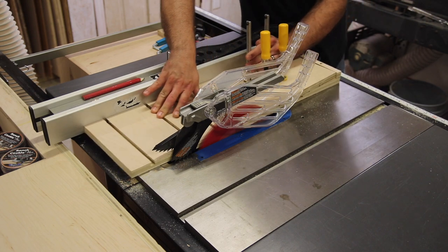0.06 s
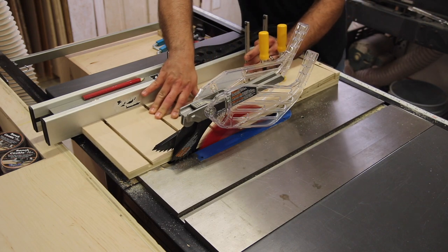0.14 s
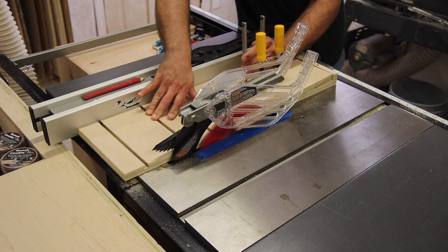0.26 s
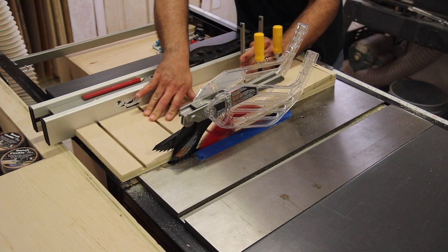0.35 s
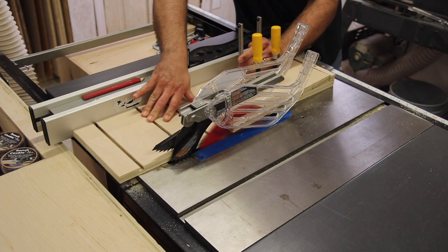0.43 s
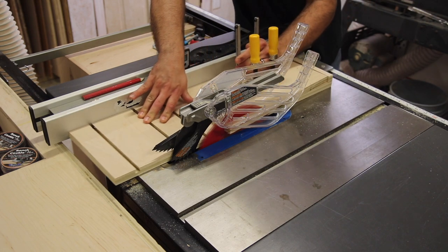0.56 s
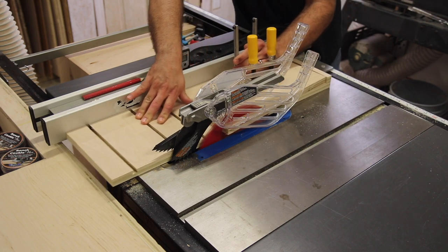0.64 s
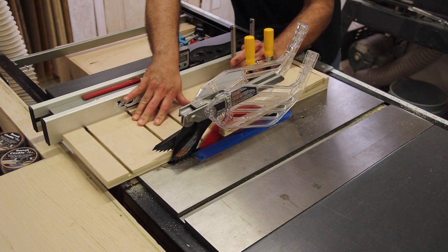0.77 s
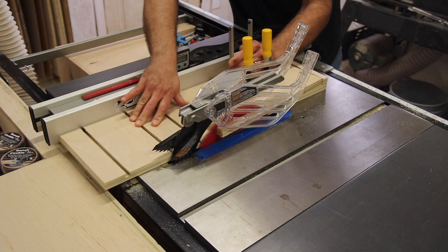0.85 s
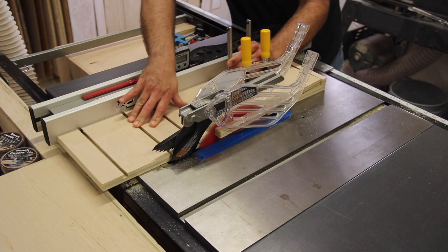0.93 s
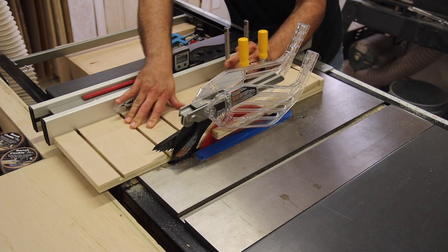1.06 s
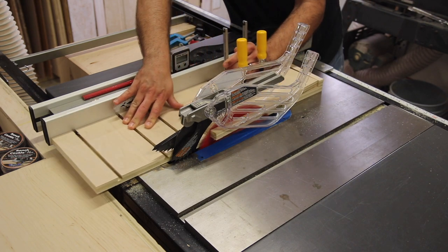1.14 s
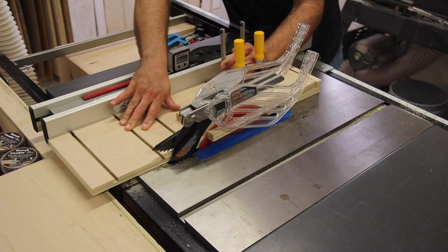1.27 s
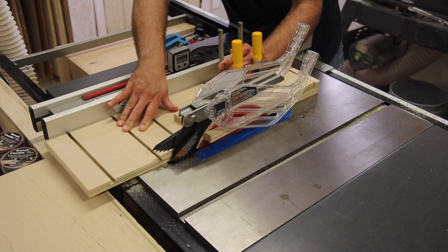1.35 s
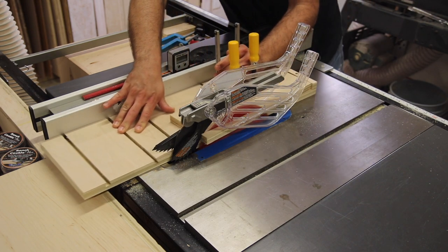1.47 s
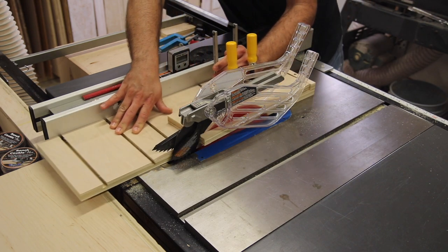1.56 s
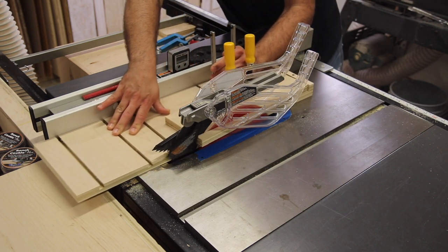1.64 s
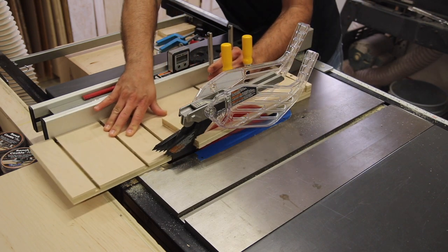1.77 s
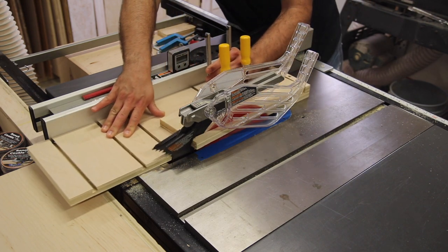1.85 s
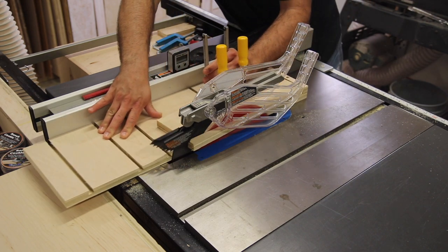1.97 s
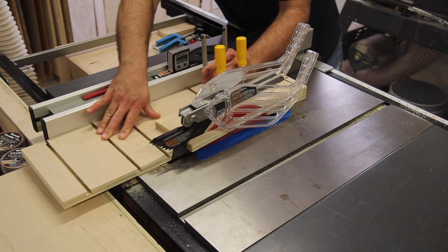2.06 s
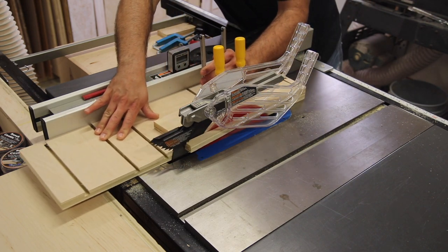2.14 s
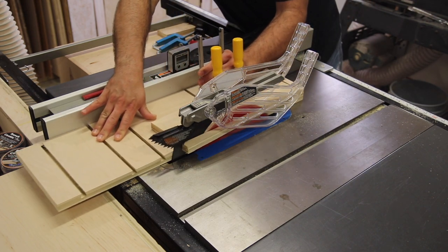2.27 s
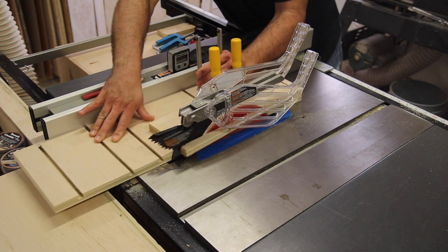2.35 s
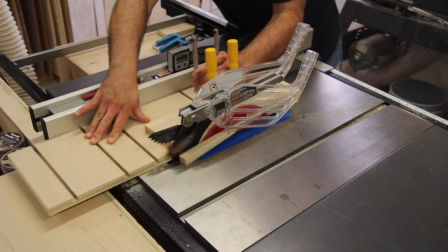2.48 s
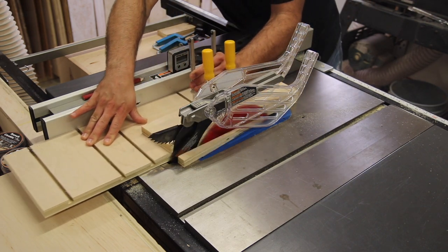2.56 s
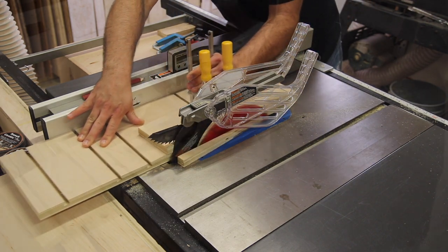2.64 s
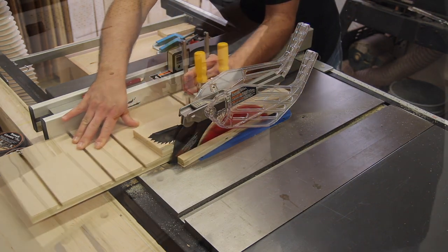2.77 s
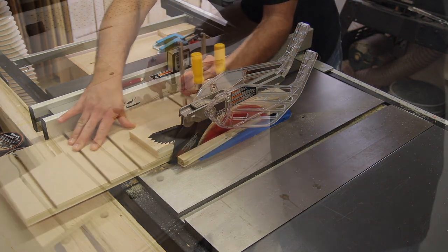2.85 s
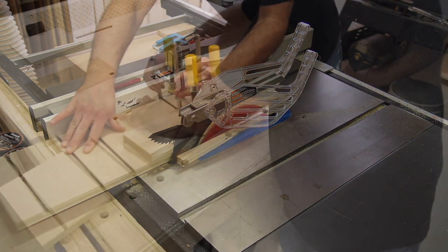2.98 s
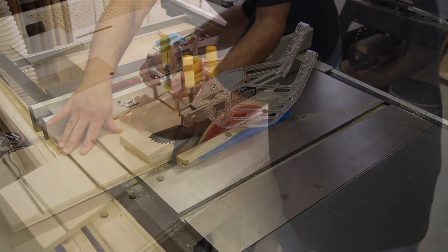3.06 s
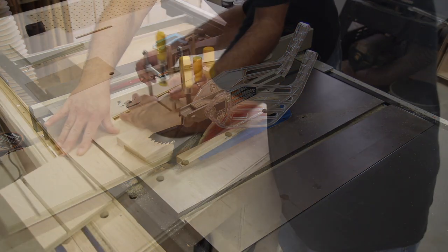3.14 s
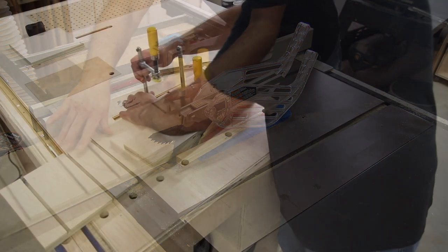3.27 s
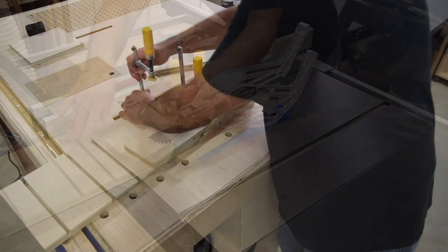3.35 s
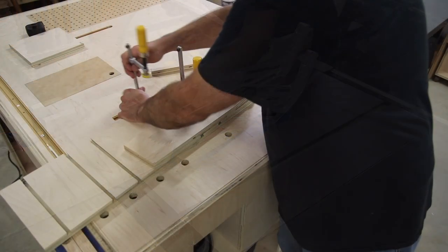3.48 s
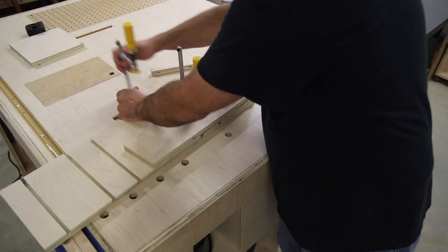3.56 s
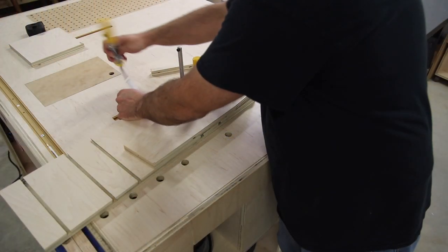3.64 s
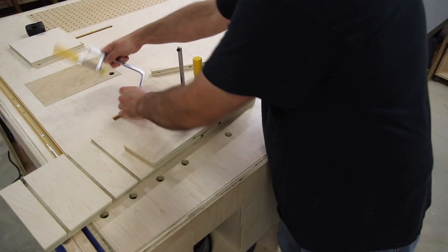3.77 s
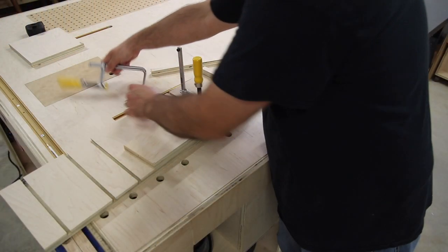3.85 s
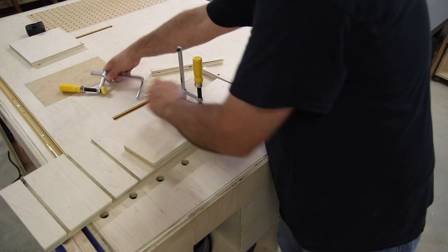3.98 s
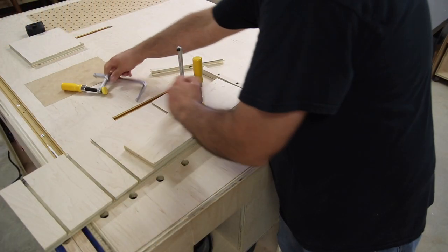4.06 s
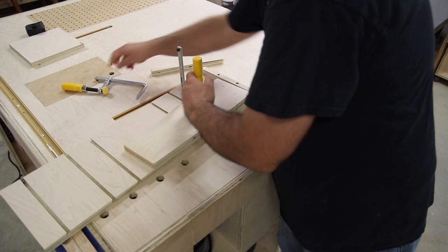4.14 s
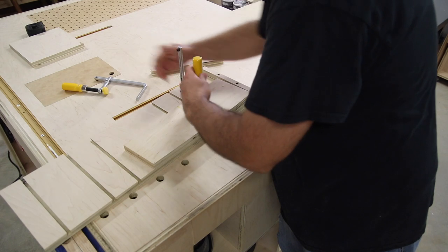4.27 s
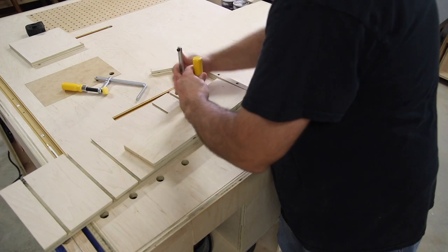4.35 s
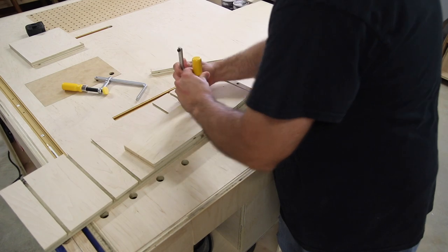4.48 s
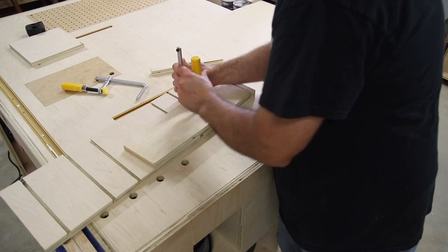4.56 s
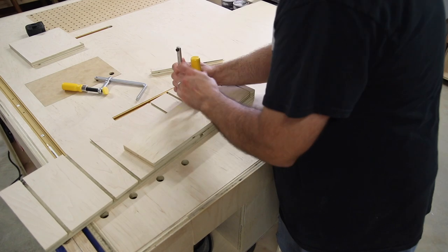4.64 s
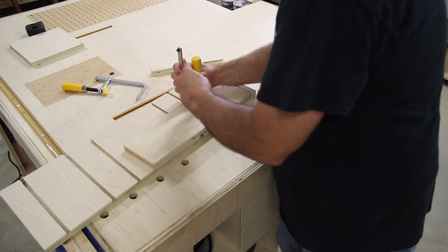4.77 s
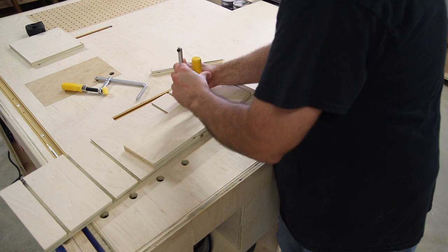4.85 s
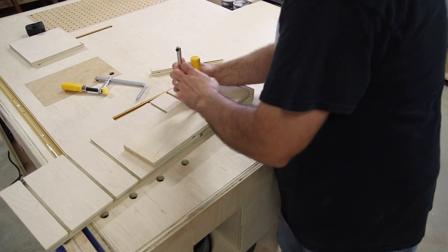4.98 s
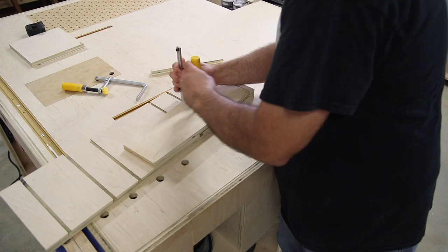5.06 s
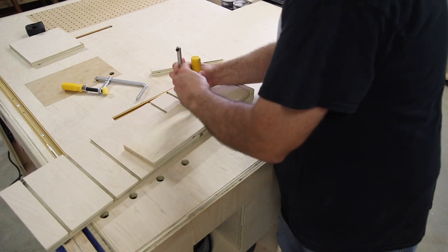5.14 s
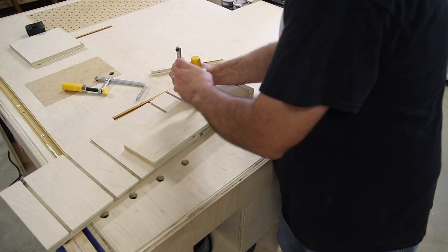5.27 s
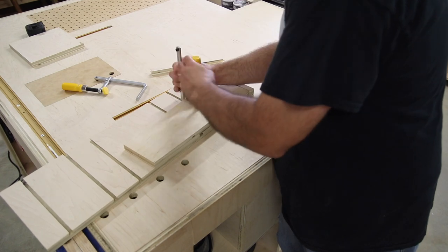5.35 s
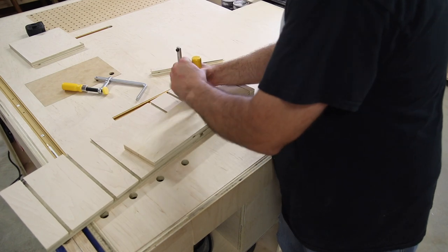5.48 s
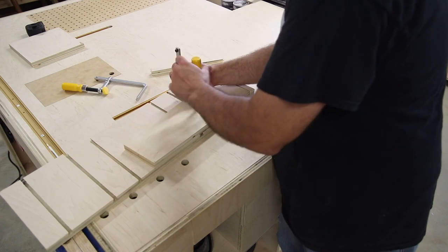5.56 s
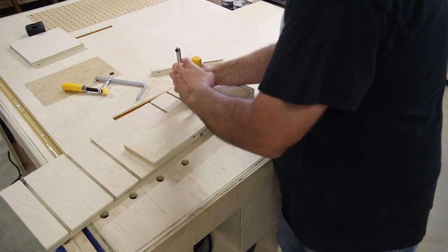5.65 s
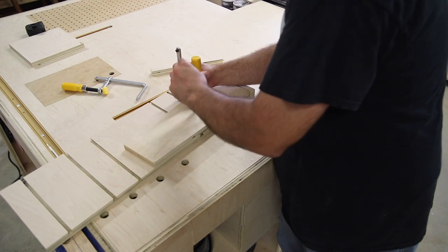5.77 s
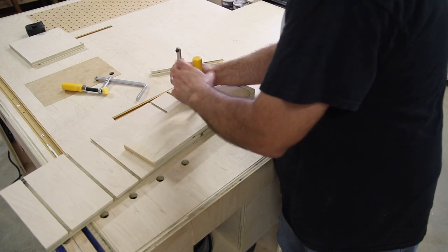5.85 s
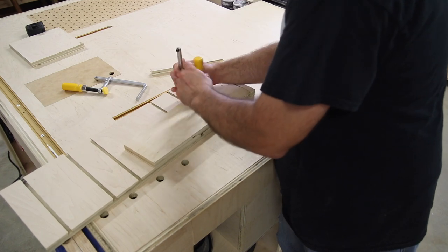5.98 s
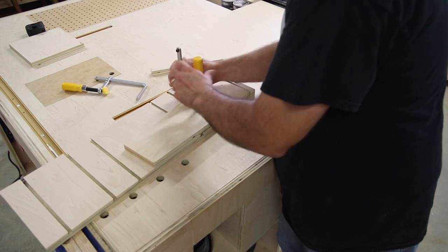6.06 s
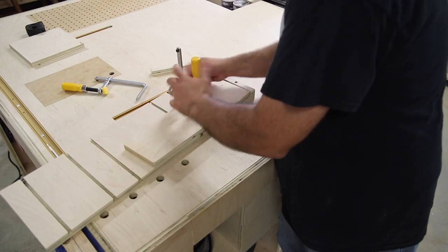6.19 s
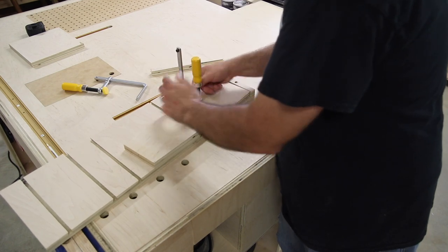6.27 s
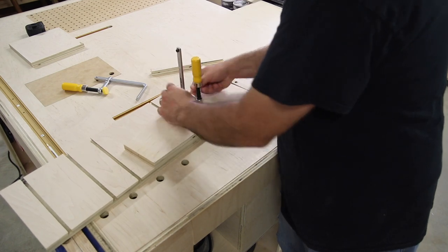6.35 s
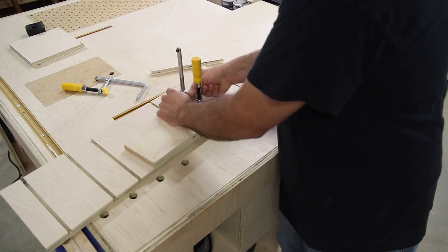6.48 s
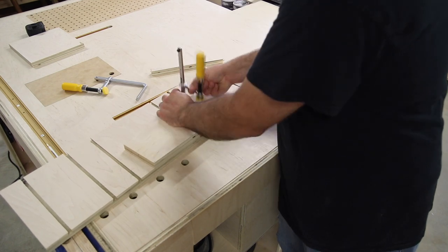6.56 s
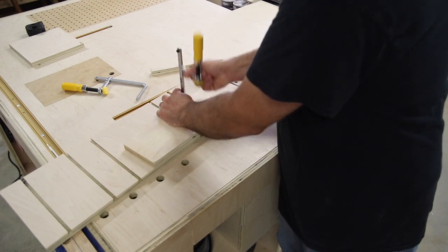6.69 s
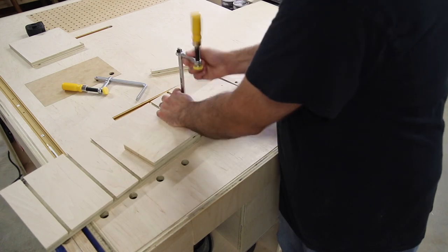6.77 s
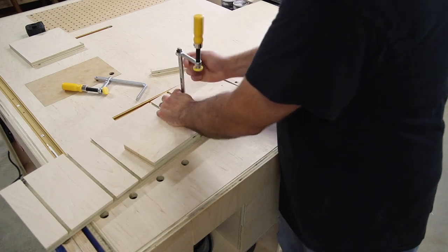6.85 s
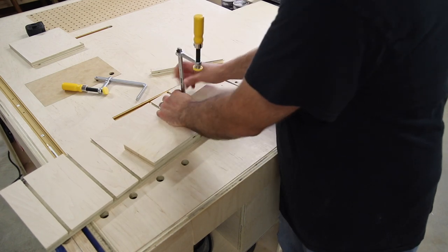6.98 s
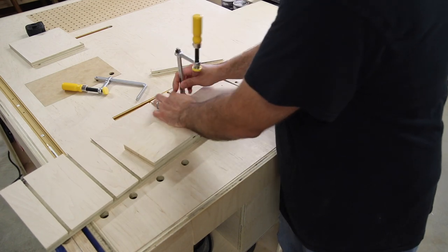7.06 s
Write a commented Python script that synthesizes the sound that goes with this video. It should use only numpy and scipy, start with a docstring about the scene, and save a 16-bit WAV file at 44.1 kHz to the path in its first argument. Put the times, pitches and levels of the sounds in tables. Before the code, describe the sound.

Close in a small workshop, a spinning saw blade sings and squeals through wood over motor hum and cabinet rumble. After a brief crack the cutting tone drops away and the rush fades. Bench handling takes over against faint hum and hiss: solid wooden blows, a bright ringing metal landing, a near-quiet pause with tiny ticks, light knocks, short clamp rubs and one hard final click.

```python
"""A table saw rips a board: its teeth whine at multiples of the shaft speed over the noisy rush of the
blade. The offcut chatters and breaks free with a crack, then the saw fades away.
At a wooden bench, decaying noise and ringing tones make knocks on a jig, heavy blows, and a steel clamp
laid down ringing; shaped noise makes another clamp slide along its groove.
A small workshop answers with dying noise, over a faint mains hum and hiss."""
import sys
import numpy as np
from scipy import signal
from scipy.fft import rfft, irfft, next_fast_len
from scipy.io import wavfile

SR = 44100
rng = np.random.default_rng(int(sys.argv[2]) if len(sys.argv) > 2 else 0)


def dump(signal):
    """Clip the signal to [-1, 1] and save it as 16-bit WAV at the path in sys.argv[1]."""
    limited = np.clip(np.atleast_2d(signal).T, -1, 1)
    pcm = np.round(limited * 32767).astype(np.int16)
    wavfile.write(sys.argv[1], SR, pcm)


N = 313979
T = np.arange(N) / SR  # the time of every sample, in seconds


def amp(db):
    """Turn decibels into a gain."""
    return 10 ** (np.asarray(db) / 20)


def unit(x):
    """Scale x to an average strength (rms) of 1."""
    return x / np.sqrt(np.mean(x ** 2) + 1e-20)


def sine(hz):
    """A steady pure tone of rms 1."""
    return np.sqrt(2) * np.sin(2 * np.pi * hz * T)


def along(points, hz):
    """Read a curve of (frequency, value) points, joined by straight lines on a log axis."""
    f, v = np.transpose(points)
    return np.interp(np.log(hz + 1), np.log(f + 1), v)


def ramp(start, end):
    """0 before start, 1 after end, a straight line between."""
    return np.clip((T - start) / (end - start), 0, 1)


def since(s):
    """Seconds since s, zero before it."""
    return np.maximum(T - s, 0)


def stroke(s, length, rise_db_per_s, fall_db_per_s):
    """A gain that rises to 1 at s, holds for the length and falls away."""
    before = np.maximum(s - T, 0)
    return amp(-rise_db_per_s * before - fall_db_per_s * since(s + length))


def wobble(rate):
    """A randomly wandering curve that takes a new direction rate times a second."""
    knots = rng.standard_normal(int(N * rate / SR) + 2)
    return np.interp(T * rate, np.arange(len(knots)), knots)


def filtered(x, response):
    """Multiply each frequency in x by a response."""
    m = next_fast_len(len(x) + 4096)
    spectrum = rfft(x, m) * response(np.fft.rfftfreq(m, 1 / SR))
    return irfft(spectrum, m)[:len(x)]


def coloured(x, spectrum):
    """Shape x with a table of frequencies and levels, then scale it to rms 1."""
    return unit(filtered(x, lambda hz: amp(along(spectrum, hz))))


def noise(spectrum, size=N):
    """Coloured noise of rms 1."""
    return coloured(rng.standard_normal(size), spectrum)


def resonant(x, centre_hz, q):
    """Pass x through one resonance, narrower for a higher q, then scale it to rms 1."""
    return unit(filtered(x, lambda hz: 1 / (1 + 1j * q * (hz / centre_hz - centre_hz / (hz + 1)))))


def ring(modes, t, spread_db):
    """Sum of dying tones, each at a new random strength for every blow."""
    total = 0
    for hz, db, t60 in modes:
        level_db = db + spread_db * rng.standard_normal() - 60 * t / t60
        total = total + amp(level_db) * np.sin(2 * np.pi * (hz * t + rng.random()))
    return total


def add(track, s, sound):
    """Mix a sound into the track at s seconds."""
    part = track[round(s * SR):][:len(sound)]
    part += sound[:len(part)]


# how long the workshop rings: (frequency [Hz], time to fall by 60 dB [s])
ROOM = [(150, 0.56), (500, 0.37), (1500, 0.37), (4000, 0.35), (8000, 0.3), (15000, 0.26)]


def dying(size):
    """Noise in which each frequency dies at the workshop's own speed, after a soft start."""
    hz, t, z = signal.stft(rng.standard_normal(size), SR, nperseg=256)
    decay = amp(-60 * t / along(ROOM, hz)[:, None])
    tail = signal.istft(z * decay, SR, nperseg=256)[1][:size]
    return tail * (1 - np.exp(-np.arange(size) / SR / 0.005))


def in_room(x, wet_db):
    """x plus the workshop's answer, made by smearing x with dying noise."""
    tail = dying(SR // 2)
    answer = signal.fftconvolve(x, tail / np.linalg.norm(tail))[:len(x)]
    return x + amp(wet_db) * answer


# the mains hum, before the background gain: (frequency [Hz], level [dB])
MAINS = [(57.5, -78.5), (118, -75.5)]
# colour of the background hiss: (frequency [Hz], relative level [dB])
FLOOR = [(25, -31), (55, -7), (85, -17.5), (200, -12), (400, -12.5), (900, -26.5), (4000, -33),
         (15500, -38)]
# gain of hum and hiss together: (time [s], level [dB])
BACKGROUND_LEVEL = [(2.4, 7.5), (3.1, 19.5), (3.68, 18), (3.9, 1)]


def workshop():
    """Noise for hiss and slowly wavering tones for mains hum, strongest while the saw dies away."""
    hum = sum(amp(db + wobble(2.7)) * sine(hz) for hz, db in MAINS)
    hiss = amp(-75.5) * noise(FLOOR)
    times, levels_db = np.transpose(BACKGROUND_LEVEL)
    return amp(np.interp(T, times, levels_db)) * (hum + hiss)


# colour of the scraping: (frequency [Hz], relative level [dB])
SCRAPE = [(90, -28.5), (240, 0.5), (420, 1), (600, -9), (850, -21), (1200, -9.5), (1620, -10), (2400, -12),
          (3200, -11), (4200, -16), (6000, -28), (10500, -32.5), (15500, -59)]
# rubs: the clamp's foot in its groove, and at 5.2 s a hand on the screw handle: # (start [s], length [s], level
# [dB], resonance [Hz])
RUBS = [(3.573, 0.046, -50, 1186), (5.208, .09, -80, 3400), (5.767, 0.055, -70, 3330),
        (6.6, .09, -40, 1620), (6.7, .075, -42, 3120), (6.779, .05, -42, 1620)]
# how fast each rub grips and lets go
RUB_RISE_DB_PER_S, RUB_FALL_DB_PER_S = 3500, 1204
RUB_RING_DB, RUB_RING_Q = -7, 7  # the resonance against the scrape


def slide():
    """The clamp's foot scrapes in a dense run of tiny slips; the resonance shifts along the groove."""
    slips_per_s = 110 * amp(4 * wobble(70))
    since_slip = np.cumsum(slips_per_s) / SR % 1  # goes from 0 to 1 between slips
    friction = amp(-11 * since_slip + 2.5 * wobble(400)) * rng.standard_normal(N)
    rub = coloured(friction, SCRAPE)
    strokes = np.zeros(N)
    for s, length, db, hz in RUBS:
        grip = amp(db) * stroke(s, length, RUB_RISE_DB_PER_S, RUB_FALL_DB_PER_S)
        strokes += grip * (rub + amp(RUB_RING_DB) * resonant(friction, hz, RUB_RING_Q))
    return in_room(strokes, wet_db=-6.5)


# ringing tones of the steel bar: (frequency [Hz], relative level [dB], time to fall by 60 dB [s])
STEEL = [(6470, -18, 0.33), (7390, -11.5, 0.39), (9150, -13, .3), (9330, -3.5, 0.24), (12240, 4, 0.16),
         (14020, -20.5, 0.33), (14550, -7.5, 0.25), (15560, -10.5, 0.12)]
# broad resonances of the clamp's loose jaw: (frequency [Hz], relative level [dB])
JAW = [(1970, -25), (4050, -34.5)]
# steel meets the bench: (time [s], level [dB])
CLINKS = [(4.1618, -26), (4.176, -36.5), (4.2012, -42.5), (4.25, -50.5)]
# bright chink of each contact: pitch, relative level, time to fall by 60 dB
CHINK_HZ, CHINK_DB, CHINK_T60_S = 12580, 3.5, .015


def clamp_bar():
    """The steel bar lands, bounces with bright chinks and rings unsteadily; its loose jaw rattles."""
    track, t = np.zeros(N), np.arange(SR * 3 // 4) / SR
    for s, db in CLINKS:
        chink_noise = resonant(rng.standard_normal(len(t)), CHINK_HZ, q=10)
        chink = amp(CHINK_DB - 60 * t / CHINK_T60_S) * chink_noise
        jaw = sum(amp(level) * resonant(dying(len(t)), hz, q=5) for hz, level in JAW)
        add(track, s, amp(db) * (ring(STEEL, t, spread_db=1.5) + chink + jaw))
    unsteady = amp(3.5 * wobble(200) - 2)
    return in_room(track * unsteady, wet_db=-8)


# colours of a wooden clack and of a sharp tick: (frequency [Hz], relative level [dB])
CLACK = [(40, -44), (200, -2), (750, -8), (1100, -2.5), (1700, -4.5), (3500, -3), (5000, -12.5),
         (8000, -28), (16000, -44)]
TICK = [(2500, -17.5), (5500, 3.5), (10000, -2), (16000, -10.5)]
# colour of a heavy blow's tail: (frequency [Hz], relative level [dB])
BODY = [(50, -48.5), (140, -12), (250, -5.5), (480, 1.5), (720, 1.5), (1000, -7.5), (1900, -7),
        (2800, -11.5), (4200, -10.5), (5500, -17.5), (16000, -35)]
# ringing tones of the bench top: (frequency [Hz], relative level [dB], time to fall by 60 dB [s])
BENCH = [(264, -14, .38), (445, 2.5, 0.33), (742, -2, 0.24), (1360, -11, .11)]
# heavy blows on the bench: (time [s], level [dB], ring of the bench top against the blow [dB])
BLOWS = [(3.94, -26, -13), (3.944, -14.5, -15), (3.948, -22, -16), (4.1524, -28.5, -24.5),
         (4.1605, -16.5, -20.5)]


def blows():
    """A heavy blow cracks, rings the bench top and fills the bench's frame and the room with a tail."""
    track, t = np.zeros(N), np.arange(SR * 3 // 4) / SR
    for s, db, ring_db in BLOWS:
        contact_noise = noise(CLACK, size=len(t)) + amp(-10) * noise(TICK, size=len(t))
        contact = amp(-60 * t / .022) * contact_noise
        body = amp(-27.5) * coloured(dying(len(t)), BODY)
        top = amp(ring_db) * ring(BENCH, t, spread_db=3.5) * (1 - np.exp(-t / 0.0046))
        soft_start = 1 - np.exp(-t / 0.00079)
        add(track, s, amp(db) * (contact + body + top) * soft_start)
    return track


# ringing tones of the wooden jig, varied a little at each knock:
# (frequency [Hz], relative level [dB], time to fall by 60 dB [s])
JIG = [(488, -6, .12), (1090, -5, 0.087), (1620, -1.5, 0.049), (3400, -2.5, .045)]
# knocks on jig and bench; a hard contact ticks more and thuds less:
# (time [s], level [dB], hardness [dB], thud pitch [Hz])
KNOCKS = [(3.076, -31, -6.5, 273), (3.1, -29, -5, 255), (3.349, -47, -12, 260), (3.363, -36.5, 6.5, 400),
          (3.373, -31.5, 2.5, 300), (3.71, -48, 1, 410), (3.773, -54, 6.5, 395), (4.45, -66, -12.5, 335),
          (4.934, -61, 12, 401), (4.947, -51.5, 3.5, 348), (5.528, -59, -2, 398), (5.575, -59, 5, 494),
          (5.802, -43.5, -1.5, 402), (5.85, -40, 3.5, 406), (5.893, -43, -1.5, 285),
          (6.003, -46.5, -5.5, 299), (6.073, -44.5, -9, 266), (6.132, -36, 1, 308), (6.205, -54, -3, 354),
          (6.325, -60.5, 7.5, 396), (6.518, -65.5, -10.5, 399), (6.596, -32, 8.5, 344),
          (6.611, -33.5, 4.5, 386), (6.662, -33, 8, 350), (6.833, -24, 14, 390), (6.838, -32.5, -4.5, 413)]
TICK_DB = -17  # the tick of a contact of hardness 0, against the knock's level


def knocks():
    """Each contact gives a sharp tick, a wooden clack and a thud at its own pitch, and rings the jig."""
    track, t = np.zeros(N), np.arange(SR // 2) / SR
    for s, db, hardness_db, thud_hz in KNOCKS:
        tick = amp(db + TICK_DB + hardness_db - 60 * t / 0.027) * noise(TICK, size=len(t))
        clack = amp(db - 2.5 - 60 * t / 0.024) * noise(CLACK, size=len(t))
        thud_noise = resonant(rng.standard_normal(len(t)), thud_hz, q=3.4)
        thud_noise = resonant(thud_noise, thud_hz, q=1.2)
        thud = amp(db - hardness_db - 0.5 - 60 * t / 0.066) * thud_noise
        # stretching time shifts the jig's pitch and decay together
        stretched = t * (1 + 0.055 * rng.standard_normal())
        wood = amp(db - 11.5) * ring(JIG, stretched, spread_db=2.5)
        knock = in_room(tick + clack + wood, wet_db=-9.5) + in_room(thud, wet_db=-6.5)
        add(track, s, knock * (1 - np.exp(-t / 0.00065)))
    return track


# colour of the offcut breaking free: (frequency [Hz], relative level [dB])
CRACK = [(250, -9.5), (600, -3.5), (1300, 0.5), (3500, -7), (5000, -11), (12000, -13)]
CRACK_S, CRACK_LENGTH_S, CRACK_DB, CRACK_FALL_DB_PER_S = 2.581, .014, -28.5, 328


def crack():
    """The offcut breaks free and clatters against the teeth: one short, ragged burst of noise."""
    burst = stroke(CRACK_S, CRACK_LENGTH_S, rise_db_per_s=6002.0, fall_db_per_s=CRACK_FALL_DB_PER_S)
    return amp(CRACK_DB) * burst * unit(amp(2.1 * wobble(350)) * noise(CRACK))


# the thin offcut chatters as it comes free: when it reaches full strength, how long it holds, level
CHATTER_S, CHATTER_LENGTH_S, CHATTER_DB = 1.36, 0.49, -45
CHATTER_RISE_DB_PER_S, CHATTER_FALL_DB_PER_S = 99.5, 46
# its resonance sinks from high to low with this time constant
CHATTER_HIGH_HZ, CHATTER_LOW_HZ, CHATTER_SINK_S = 985, 786, .12


def chatter():
    """The offcut buzzes in a broad resonance that sinks as the strip grows longer."""
    loose = stroke(CHATTER_S, CHATTER_LENGTH_S, CHATTER_RISE_DB_PER_S, CHATTER_FALL_DB_PER_S)
    sink = np.exp(-since(CHATTER_S) / CHATTER_SINK_S)
    hz = CHATTER_LOW_HZ + (CHATTER_HIGH_HZ - CHATTER_LOW_HZ) * sink
    tone = np.sqrt(2) * np.sin(2 * np.pi * np.cumsum(hz) / SR)
    return amp(CHATTER_DB) * loose * unit(wobble(260)) * tone  # the fast wobble broadens the tone


FAN_HZ, FAN_DB = 414, -52.5


def fan():
    """A fan beside the saw holds its own steady pitch while its level wavers."""
    return amp(FAN_DB + 2 * wobble(16)) * sine(FAN_HZ)


# the blade goes deeper into the board, then breaks out of its end and spins up (time constant)
DEEPER_S, DEEPEST_S, BREAKOUT_S, SPIN_UP_S = .9, 1.7, 2.58, 0.22
# shaft speed early in the cut, deep in the cut and running free, in turns per second
LOADED_TURNS, EASED_TURNS, FREE_TURNS = 58.42, 58.58, 59.75


def shaft_speed(progress):
    """The wood drags the motor down; it spins up once the blade is through."""
    loaded = LOADED_TURNS + progress * (EASED_TURNS - LOADED_TURNS)
    drag = np.exp(-since(BREAKOUT_S) / SPIN_UP_S)
    speed = FREE_TURNS + (loaded - FREE_TURNS) * drag
    return speed * (1 + .0008 * wobble(10))


def line(order, turn, flutter_db, rate, beat_db=0):
    """A tone of rms 1 at a multiple of the shaft speed; it flutters, and beats once a turn."""
    k = np.round(order)
    swell_db = flutter_db * (wobble(rate) + 0.88 * wobble(5 * rate))
    beat = np.sin(2 * np.pi * turn + k)  # from the wobble of the blade
    return unit(amp(swell_db + beat_db * beat) * np.sin(2 * np.pi * k * turn + k ** 2))


def every_turn(turn, groups_db=0, size=8192, count=280):
    """Uneven teeth repeat a pattern each turn, slowly changing with the grain."""
    orders = np.arange(count)
    # ten groups of teeth lift every tenth order in the treble
    strength = amp(groups_db * ((orders % 10 == 0) & (orders > 125)))

    def pattern():
        """One random shape, repeated each turn."""
        one_turn = irfft(strength * np.exp(2j * np.pi * rng.random(count)), size)
        return np.interp(turn % 1, np.arange(size) / size, one_turn)

    return pattern() + .5 * wobble(6) * pattern() + .5 * wobble(6) * pattern()


# swells in which the blade sings: (middle [s], length [s], multiple of shaft speed, level [dB])
SINGS = [(0.297, 0.38, 80, -46.5), (0.458, 0.72, 100, -52.5), (0.63, 0.24, 180, -55.5),
         (0.806, 1, 50, -42.5), (0.741, 0.68, 60, -35.5), (0.745, 0.38, 90, -45), (0.78, 0.34, 120, -57),
         (1.22, .28, 80, -38.5), (1.447, 0.84, 69, -43), (1.501, 0.65, 60, -37), (1.577, 0.46, 90, -40),
         (2.27, 0.64, 90, -40), (2.425, 0.46, 110, -45.5), (2.574, 0.02, 120, -27.5),
         (2.667, 0.18, 100, -39.5), (2.825, 0.16, 30, -46)]


def singing(turn):
    """The blade plate catches on one multiple of the shaft speed, swells into song and lets go."""
    song = np.zeros(N)
    for s, length, k, db in SINGS:
        swell = np.cos(np.pi * np.clip((T - s) / length, -.5, .5))
        song += amp(db) * swell * line(k, turn, flutter_db=1.2, rate=9, beat_db=8)
    return song


# colour of flying chips and of a grazing tooth: (frequency [Hz], relative level [dB])
CHIPS = [(3000, -6.5), (7500, 4.5), (11000, -4), (14000, 2), (16000, -11.5)]
# one tooth grazes the passing board: (start [s], length [s], level [dB])
GRAZES = [(2.303, .17, -41.5), (2.807, .115, -47.5)]


def graze(turn):
    """One proud tooth brushes the sawn edge once a turn, as a burst of noise that dies within the turn."""
    touch = amp(-35 * (turn % 1))
    passing = sum(amp(db) * stroke(s, length, rise_db_per_s=91, fall_db_per_s=399)
                  for s, length, db in GRAZES)
    return passing * unit(touch * noise(CHIPS))


# hum of the turning blade, a little weaker before the deep cut: (multiple of shaft speed, level [dB])
HUM = [(10, -43), (16, -56.5), (20, -47), (21, -53.5), (27, -53.5), (30, -54)]
# whine of the teeth: (multiple of shaft speed, level against the cutting level [dB])
WHINE = [(40, -10.5), (50, -4.5), (60, 1), (69, -2.5), (75, -10), (79, -10), (80, -8), (90, -12),
         (100, -12), (110, -14), (120, -10.5), (180, -17.5)]
# squeal of the back teeth: (multiple of shaft speed, level against the squeal level [dB])
SQUEAL = [(230, -8), (240, -7.5), (241, -8.5), (250, -12.5)]
# colours of the blade's air, the teeth's rasp and the cabinet's rumble:
# (frequency [Hz], relative level [dB])
AIR = [(700, -33), (1500, -25.5), (2300, -9.5), (2900, -5.5), (3300, 1), (3600, 1), (4000, -7), (4500, -11),
       (6000, -20.5), (10000, -40), (16000, -43)]
TEETH = [(1200, -22), (2400, -4.5), (3600, 13), (4400, 3), (5300, 4.5), (6300, -4), (8000, -3.5),
         (9500, -11), (16000, -21.5)]
CABINET = [(30, -32), (60, -16), (120, 2), (220, 0.5), (480, 0), (800, 0.5), (1100, -7), (1800, -1),
           (3500, -21.5)]
# rush of the blade, and the cut and squeal before the deep cut
AIR_DB, CUT_DB, SQUEAL_DB = -32, -36.5, -46
# how the deep cut changes them, and when the squeal is at its fullest
DEEP_CUT_DB, DEEP_SQUEAL_DB, FULL_SQUEAL_S = -1.5, 8, 1.6
# how fast cutting and squeal die down around the breakout
CUT_FALL_DB_PER_S, SQUEAL_FALL_DB_PER_S = 18.5, 47.5
FADE_FROM_S, FADE_UNTIL_S, FADE_POWER = 2.69, 3.68, 1.58  # the saw fades away


def saw():
    """Blade air, cabinet rumble, hum and fan, with the whine, squeal, rasp and chip spray of the cut."""
    progress = ramp(DEEPER_S, DEEPEST_S)
    cut_db = CUT_DB + DEEP_CUT_DB * progress - CUT_FALL_DB_PER_S * since(BREAKOUT_S)
    squeal_db = SQUEAL_DB + DEEP_SQUEAL_DB * ramp(DEEPER_S, FULL_SQUEAL_S)
    squeal_db = squeal_db - SQUEAL_FALL_DB_PER_S * since(BREAKOUT_S - .1)

    turn = np.cumsum(shaft_speed(progress)) / SR  # turns made so far
    # the blade shudders in its slot, blurring its high tones
    shaken = turn + .00035 * wobble(160)

    hum = sum(amp(db - 2.5 * (1 - progress)) * line(k, turn, flutter_db=2.5, rate=5.6) for k, db in HUM)
    whine_beat_db = 2.5 + 3 * progress
    whine = amp(cut_db) * sum(
        amp(db) * line(k, shaken, flutter_db=2, rate=5, beat_db=whine_beat_db) for k, db in WHINE)
    squeal = amp(squeal_db) * sum(
        amp(db) * line(k, shaken, flutter_db=4.5, rate=6.7, beat_db=5.0) for k, db in SQUEAL)
    rasp = amp(cut_db + 1.8) * coloured(every_turn(shaken, groups_db=12), TEETH)

    # each of the ten groups of teeth throws a puff of chips, more on one side of the turn
    group_db = 5 * np.sin(2 * np.pi * 10 * turn)
    side_db = 3.5 * np.sin(2 * np.pi * turn)
    puffs = amp(group_db + side_db + wobble(120))
    chips = amp(squeal_db) * unit(puffs * noise(CHIPS))

    air = amp(AIR_DB + 0.98 * wobble(50)) * noise(AIR)
    cabinet = amp(-45.0) * noise(CABINET) + amp(-48.0) * coloured(every_turn(turn), CABINET)
    in_wood = 1 - ramp(2.92, 2.98)
    blade = air + in_wood * (chips + whine + squeal + rasp) + graze(turn) + singing(turn)
    fade = (1 - ramp(FADE_FROM_S, FADE_UNTIL_S)) ** FADE_POWER
    return fade * (cabinet + hum + fan() + chatter() + blade)


def scene():
    """The workshop's background, the work at the bench and the saw, added together."""
    bench_work = slide() + clamp_bar() + blows() + knocks()
    return (workshop() + bench_work + crack() + saw())[None]


TOP_HZ = 15800


def record(dry):
    """Weaken the deepest rumble and keep nothing from TOP_HZ up."""
    def response(hz):
        """A gentle bass cut around 28 Hz and a sharp treble limit."""
        return (hz < TOP_HZ) * hz ** 3 / (hz ** 3 + 28 ** 3)

    return np.array([filtered(x, response) for x in dry])


dry = scene()
out = record(dry)
dump(out)
```